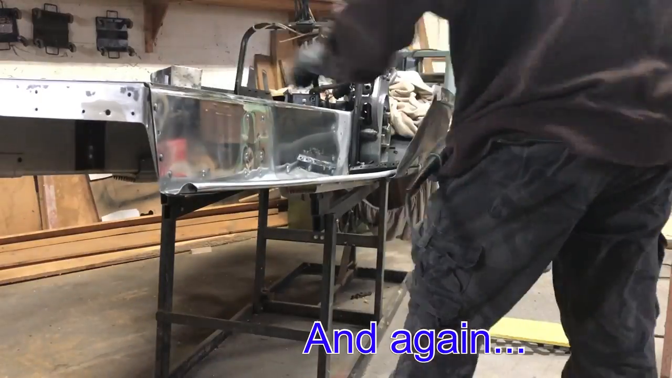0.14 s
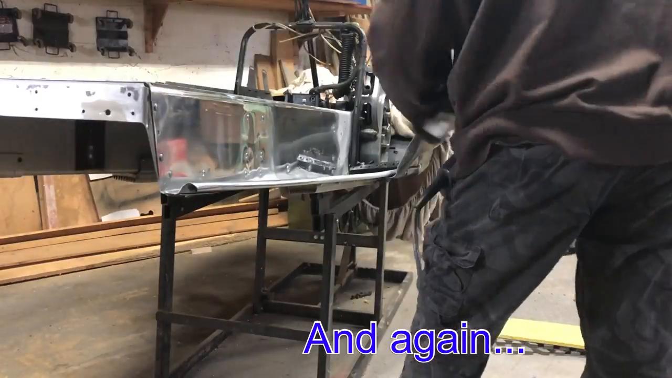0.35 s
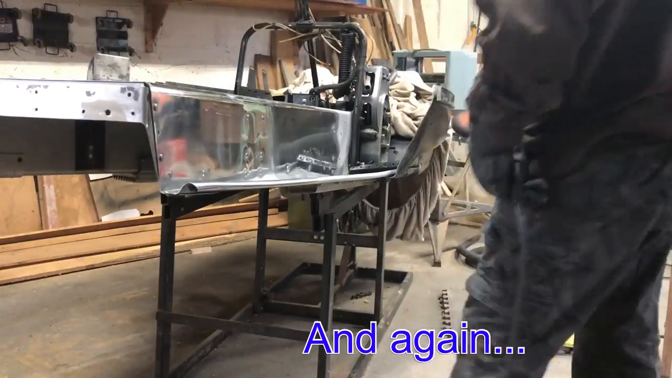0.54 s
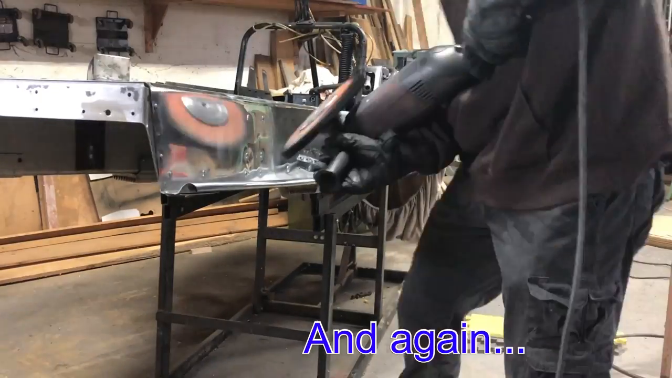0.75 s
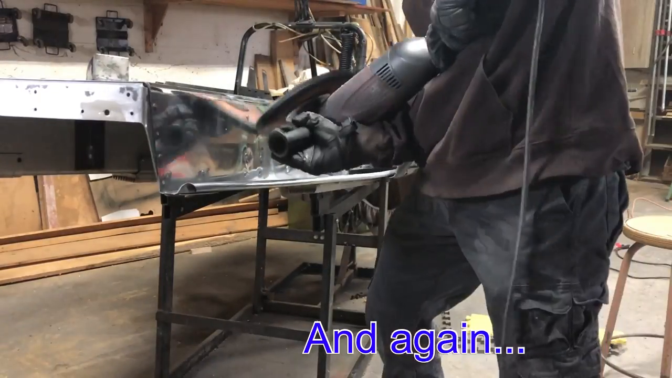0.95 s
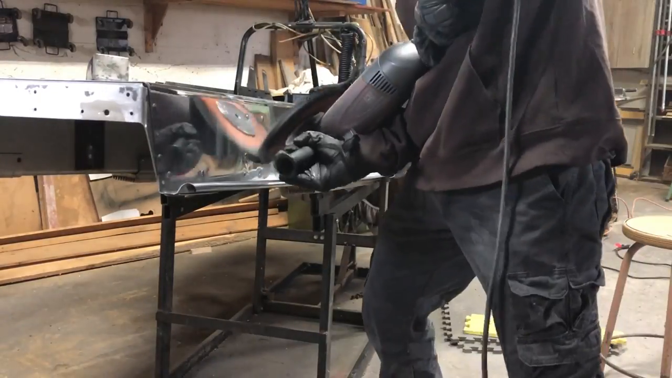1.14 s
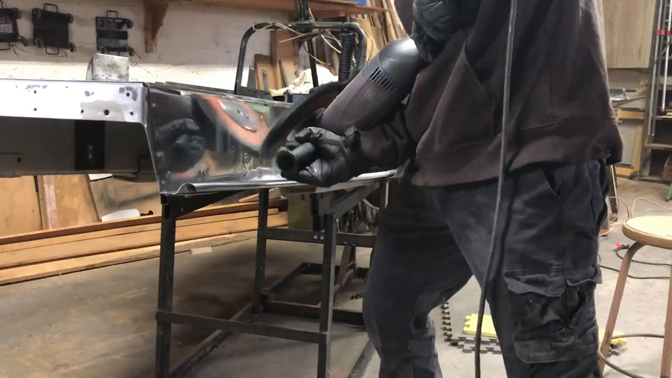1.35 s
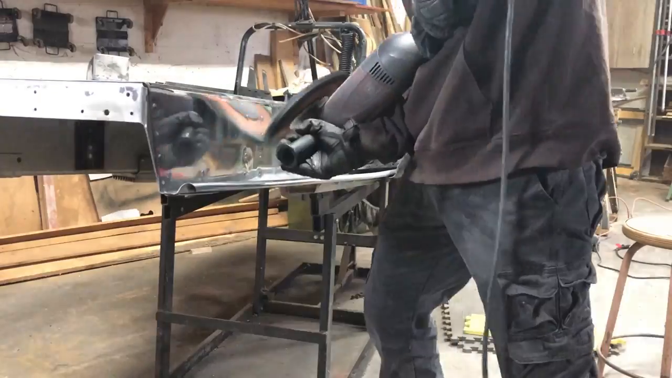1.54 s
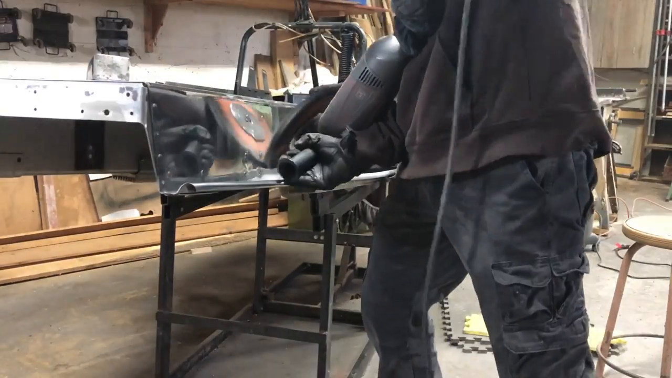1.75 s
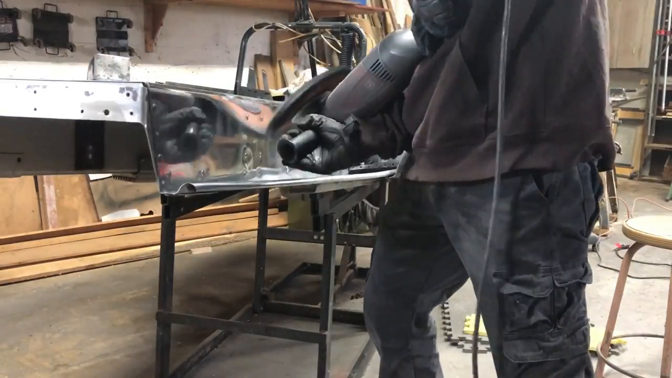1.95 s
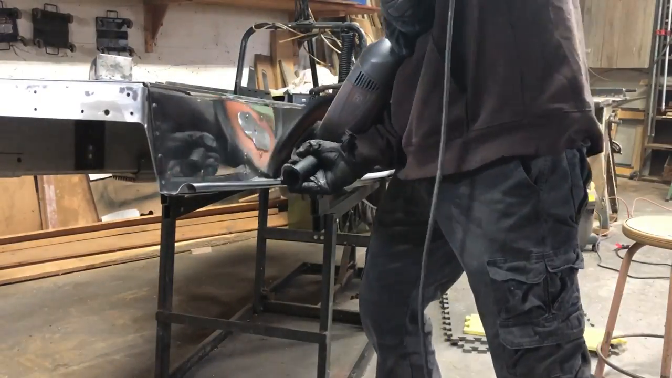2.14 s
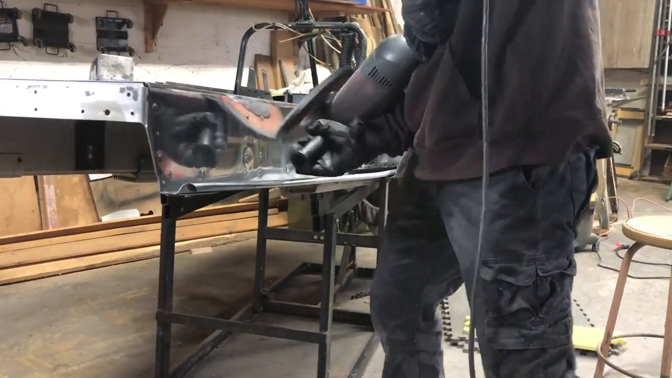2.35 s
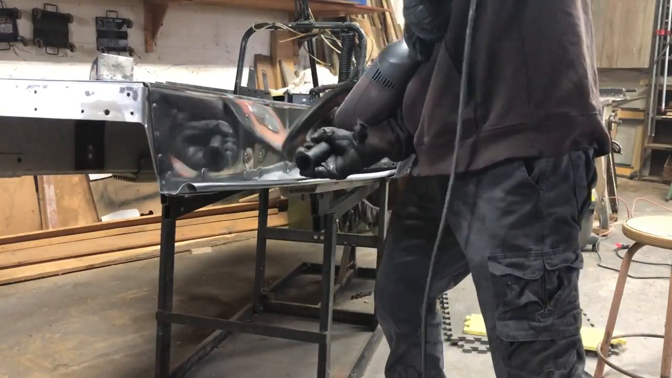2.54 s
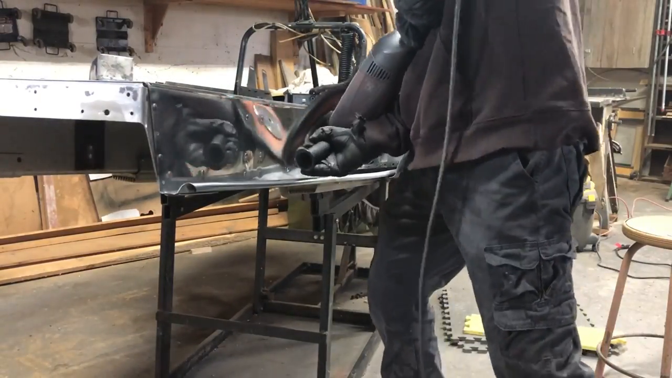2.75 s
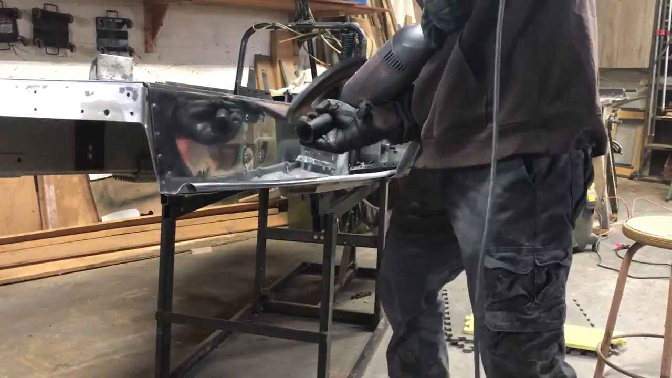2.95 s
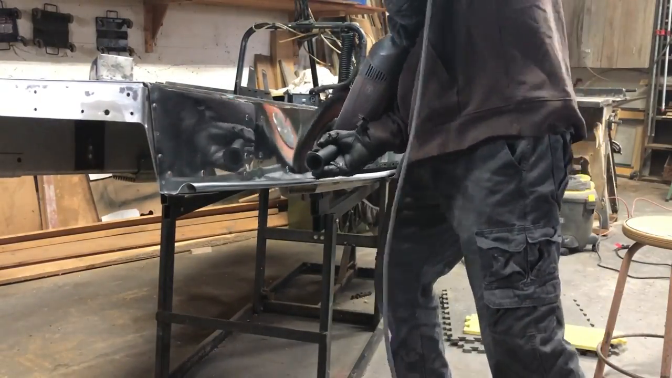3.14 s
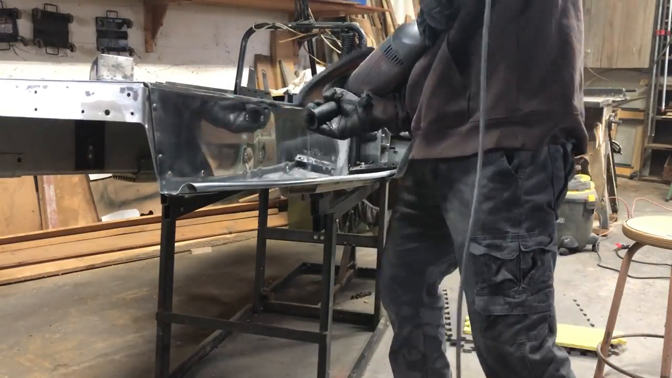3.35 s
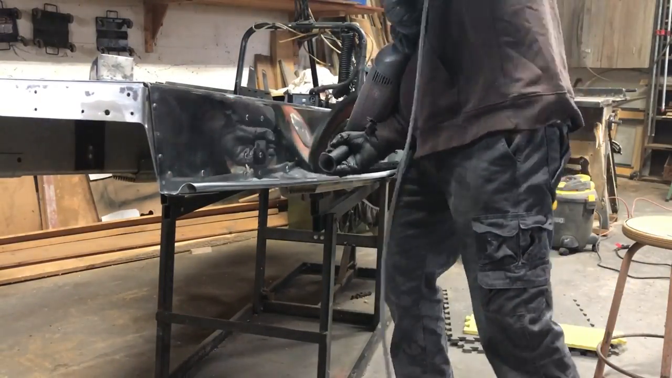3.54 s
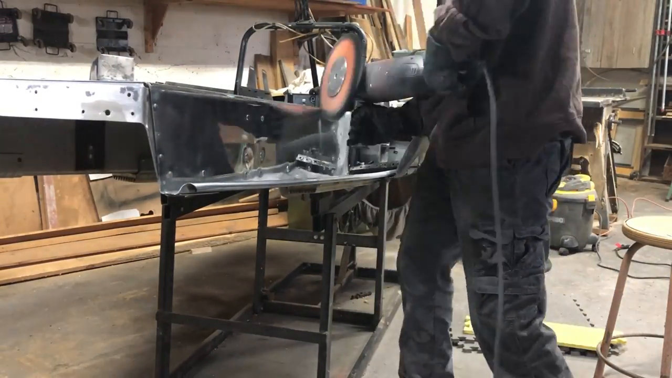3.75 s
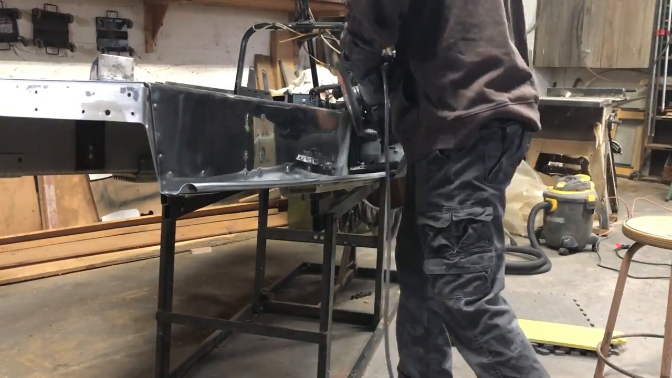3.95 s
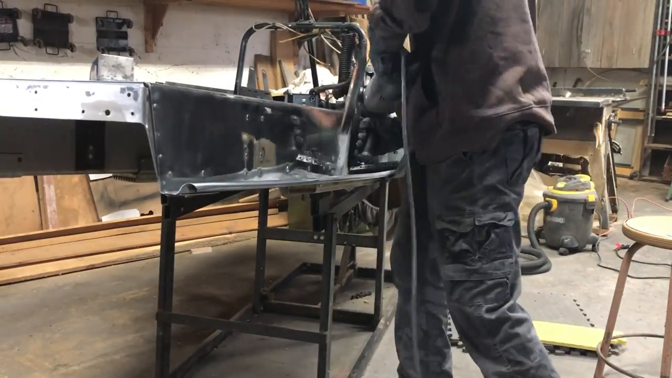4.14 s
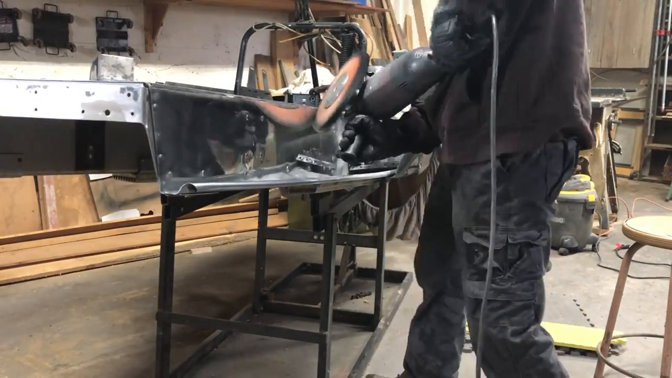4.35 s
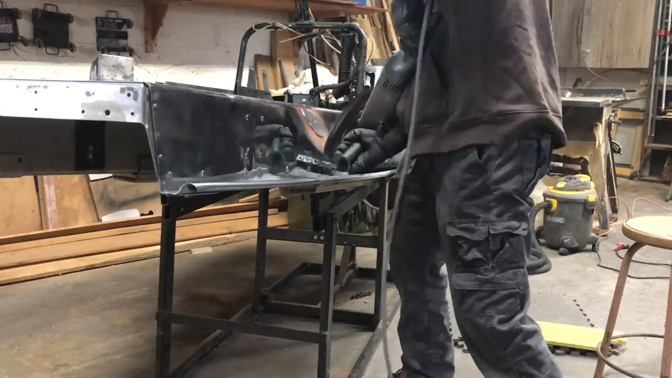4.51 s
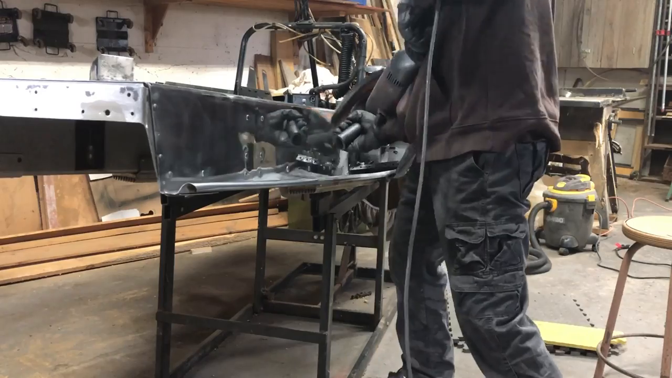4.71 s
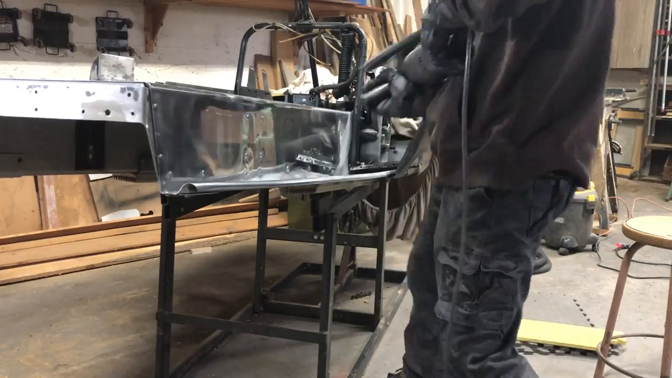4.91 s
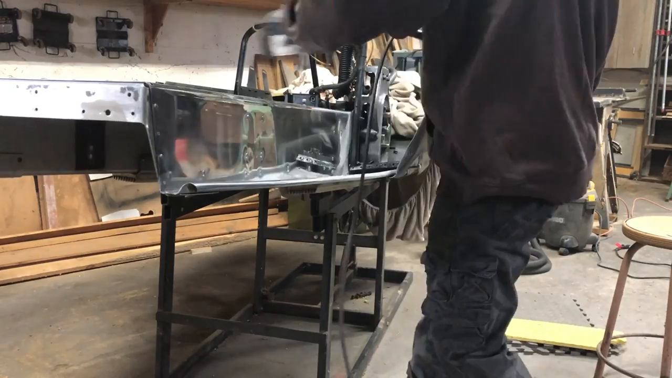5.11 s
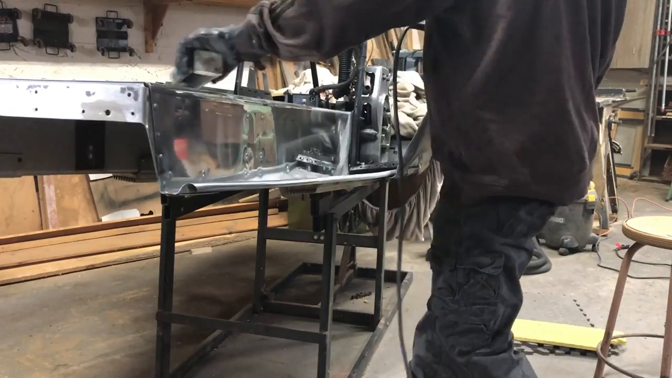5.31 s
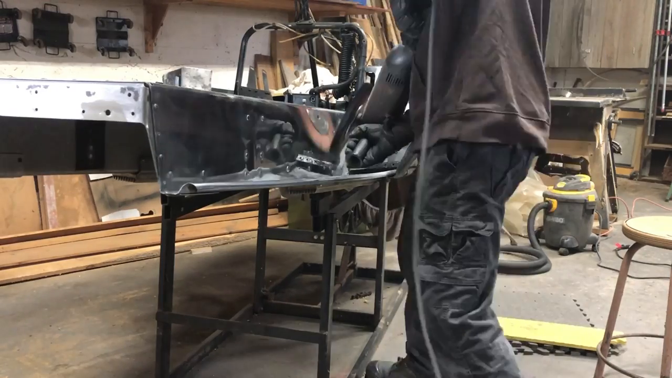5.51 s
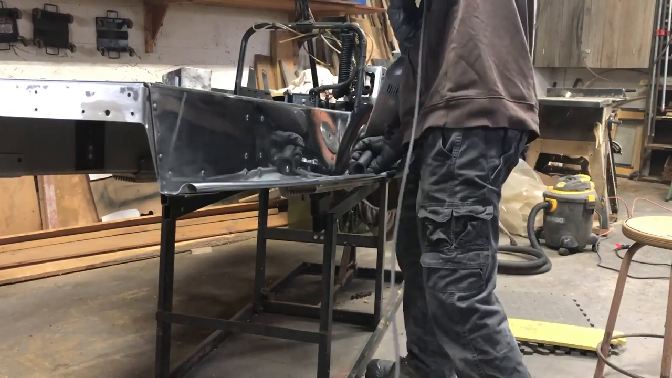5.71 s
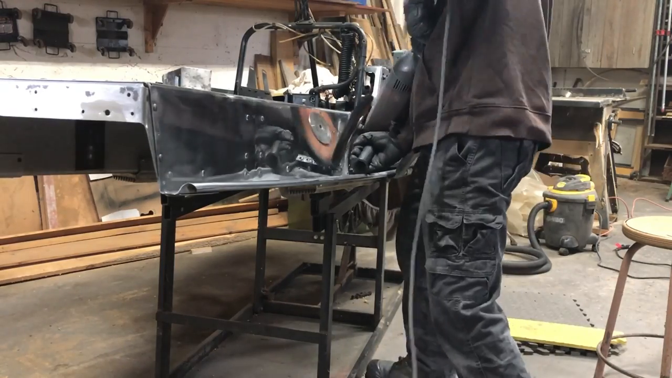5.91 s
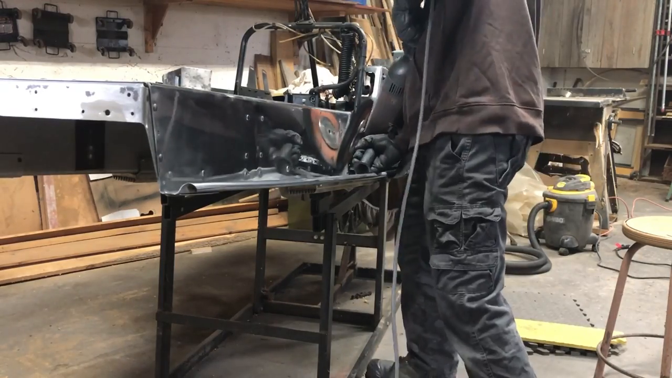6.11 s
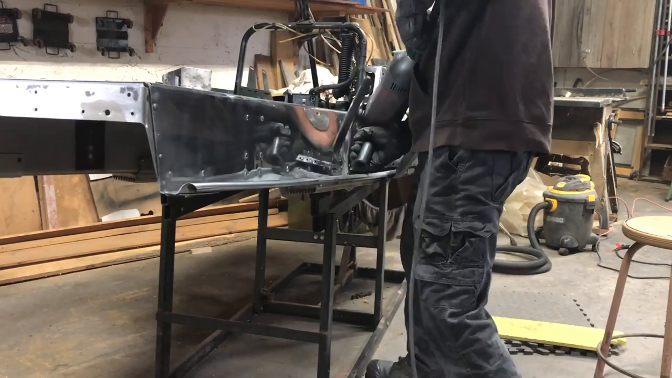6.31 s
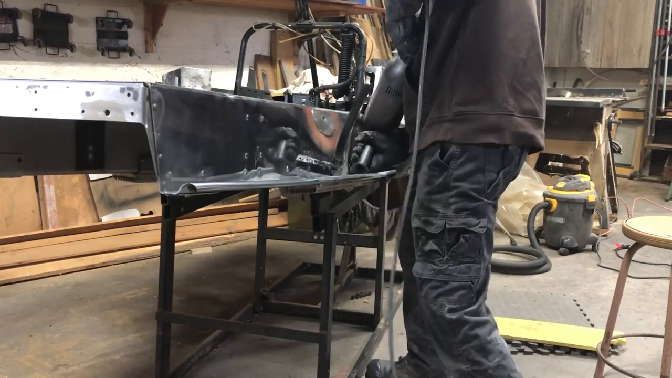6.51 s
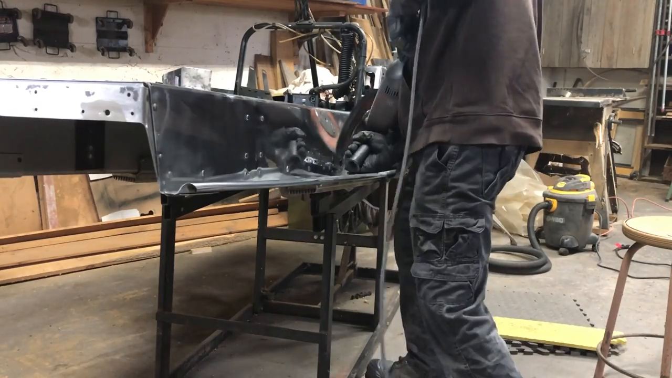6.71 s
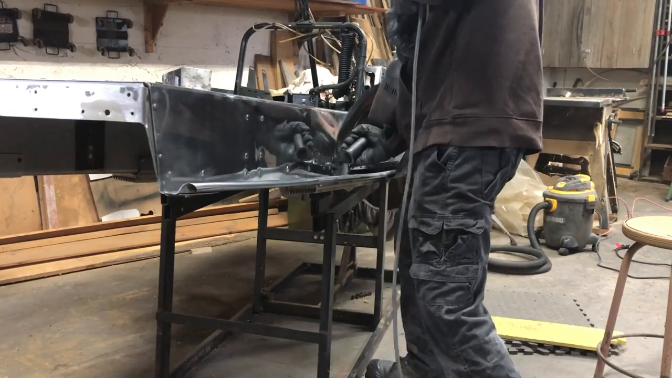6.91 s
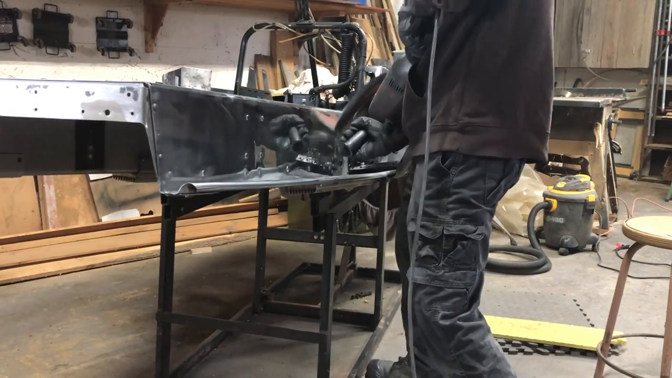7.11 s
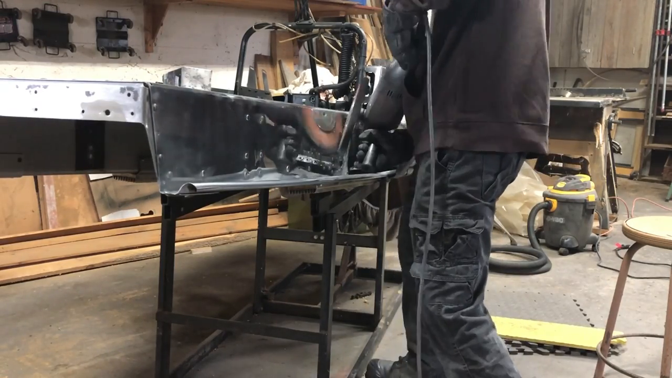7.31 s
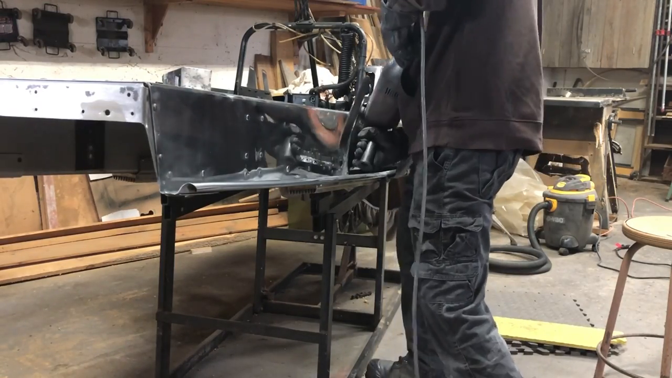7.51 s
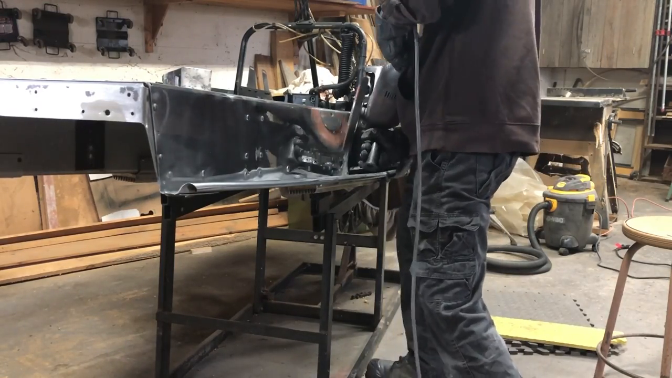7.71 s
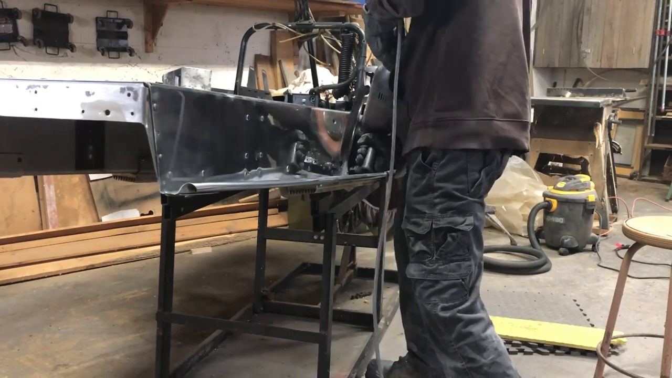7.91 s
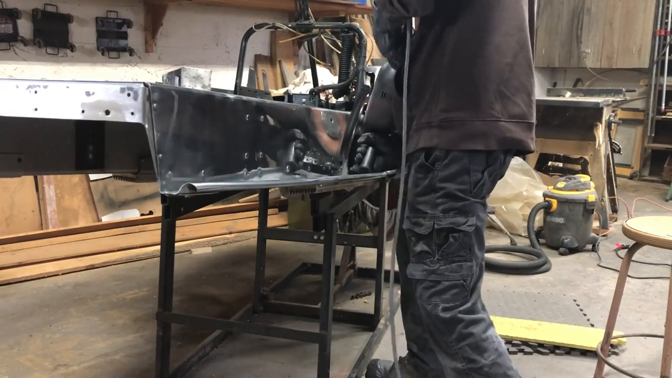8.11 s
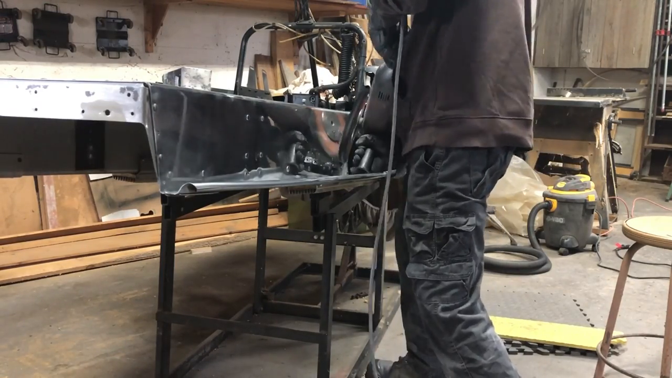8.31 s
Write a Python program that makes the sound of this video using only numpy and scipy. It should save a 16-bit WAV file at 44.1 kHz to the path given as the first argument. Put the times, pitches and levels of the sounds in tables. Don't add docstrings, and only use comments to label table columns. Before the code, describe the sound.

After a moment of quiet shop noise come a switch click, a rising fan whistle and a clank. A fast polisher whines freely, then grinds against thin metal in a ringing, singing, unsteady buzz. It lifts, presses again, pauses with a dab and a hard knock, then rubs on to the end. Close, mono, harsh and bass-light, quickened as if sped up.

```python
import sys
import numpy as np
from scipy import signal
from scipy.io import wavfile
from scipy.ndimage import uniform_filter1d

SR = 44100
rng = np.random.default_rng(int(sys.argv[2]) if len(sys.argv) > 2 else 0)


def int16_out(signal):
    q = np.round(np.clip(np.atleast_2d(signal).T, -1, 1) * 32767)
    wavfile.write(sys.argv[1], SR, q.astype(np.int16))


def volts_from_db(level):
    exponent = np.asarray(level, float) / 20
    return 10 ** exponent


N = 368676
CONTROL = 64

# [f/Hz, density/dB]
SHOP_COLOUR = [(88, -80), (150, -39), (725, -14), (815, -18), (898, -8), (1160, -17), (1580, -8),
               (15700, -18.5)]
# [f/Hz, level/dB]
SHOP_HUM = [(515, -71.5), (722, -62)]
# [t/s, f/Hz, level/dB]
COASTING_MACHINE = [(1.1, 690, -77), (1.3, 695, -52), (2.2, 663, -59), (3.3, 616, -55), (4.2, 559, -66),
                    (5.0, 543, -66), (5.8, 510, -73)]
# [t/s, level/dB]
HISS_LEVEL = [(0, -59), (.349, -31), (.444, -27), (.524, -22.5), (.913, -24), (1.44, -21), (1.56, -24),
              (2.2, -21), (2.5, -28.5), (3.7, -23.5), (3.86, -28), (4.05, -31.5), (4.94, -26.5),
              (4.99, -32.5), (5.24, -22.5), (5.5, -24.5), (6.3, -26), (8.36, -26.5)]
# [f/Hz, density/dB]
HISS_COLOUR = [(120, -78.5), (200, -39), (321, -21), (480, -51), (536, -19.5), (943, -24.5), (1050, -16),
               (1150, -14.5), (2030, -12), (2310, -8.5), (3380, -7.5), (4610, 0), (9000, 2.5), (15700, -10)]
# [t/s, level/dB, centre f/Hz, contact length/s, t60/s]
SCRAPES = [(0.135, -30.5, 6500, 0.0017, 0.021), (0.202, -38, 10000, .004, .02), (0.267, -66, 330, .01, .08),
           (0.373, -19.5, 6740, 0.028, 0.033), (0.366, -44, 2000, 0.07, .04), (.28, -55, 1100, .015, .05),
           (0.51, -21, 2000, 0.0035, 0.21), (0.917, -32.5, 1100, 0.008, 0.035),
           (1.943, -33, 1210, 0.012, .053), (2.084, -24.5, 2240, 0.064, 0.092),
           (3.558, -48, 1600, 0.016, 0.055), (5.4075, -14.5, 2400, 0.0017, 0.027),
           (5.413, -16, 2930, 0.005, 0.037), (7.39, -36.5, 1300, 0.016, .054)]
# [t/s, level/dB, centre f/Hz, contact length/s, t60/s]
PINGS = [
    (.507, -27, 1610, .012, .12),
    (0.49, -36, 2300, .015, .08),
    (.134, -36, 3050, .003, 0.045),
    (0.511, -35, 1000, 0.02, 0.12),
    (5.409, -27.5, 995, 0.025, 0.09),
    (5.396, -41.5, 327, .03, 0.35),
    (5.971, -39.5, 708, 0.042, .08),
    (8.279, -44, 720, 0.076, 0.11),
]
# [start t/s, end t/s, f/Hz, level/dB]
SWITCH_WHINES = [
    (0.187, .44, 3130, -41),
    (0.27, 0.36, 2410, -45),
    (.3, .44, 722, -56),
]
# [t/s, f/Hz, level/dB]
RUN_UP_WHISTLE = [(.2, 3500, -42), (.25, 5160, -32.5), (.29, 8140, -26), (.33, 12200, -21.5),
                  (.37, 15700, -27), (.4, 18000, -50)]
# [multiple of the wheel turn, level/dB, extra level under load/dB]
MOTOR_TONES = [(1.001, -49, -11), (1.999, -40, -15), (3.421, -43.5, -12), (4, -43, 0), (4.421, -35, -11),
               (6, -43, -7), (8.84, -52, -18)]
# [t/s, level/dB]
GEAR_WHINE = [(.33, -70), (.4, -44), (.49, -43), (.54, -44), (.57, -28), (.62, -21.5), (.66, -40),
              (.8, -35), (.9, -30), (1.02, -68)]
# [f/Hz, level/dB]
SHEET_COLOUR = [(450, -41), (1000, -6), (1550, -8), (1850, -7.5), (2350, -6.5), (3100, -2), (3650, -6.5),
                (4150, -2.5), (4600, -6.5), (5700, -2.5), (7000, -2), (8700, 1.5), (10500, -2.5),
                (15800, -6.5)]
# [t/s, length/s, order, share of
# range/dB]
SHEET_RINGS = [(1.035, 0.3, 7, -1.5), (1.148, 0.14, 6, -1), (1.277, 0.21, 7, -3.5), (1.3, 0.26, 2, -4.5),
               (1.5, 0.092, 7, -4), (1.59, 0.14, 6, -3.5), (1.624, 0.26, 2, -1), (1.705, 0.1, 5, -2.5),
               (1.82, 0.12, 6, -3.0), (2.03, 0.234, 4, -1.5), (2.02, 0.06, 6, -4.5), (2.135, 0.15, 7, 0),
               (2.265, 0.1, 6, -5), (2.663, 0.14, 6, -4.5), (2.806, 0.078, 7, -3.0), (2.86, 0.13, 3, 2.5),
               (2.9, 0.064, 7, -5), (2.978, 0.34, 4, -2.5), (3.1, 0.19, 7, -3), (3.186, 0.15, 2, 2.5),
               (3.48, 0.083, 4, -2), (3.544, 0.33, 7, -2.5), (3.986, 0.56, 4, 2), (4.535, 0.24, 7, 2),
               (4.73, 0.26, 2, -2.5), (4.74, 0.24, 6, -1), (5.627, 0.26, 7, -3), (5.837, 0.45, 4, -3),
               (6.014, 0.1, 7, -1), (6.081, 0.094, 6, -1.5), (6.1, 0.3, 4, -4), (6.12, 0.22, 7, -2.5),
               (6.105, 0.32, 3, -2.5), (6.352, 0.18, 2, -0.5), (6.481, 0.12, 6, 3.5), (6.491, 0.11, 7, 1.5),
               (6.54, 0.33, 4, 2.5), (6.695, 0.3, 7, -1.5), (6.784, 0.21, 6, 2.5), (6.79, 0.23, 4, 1),
               (7.115, 0.24, 6, -5.5), (7.19, 0.15, 7, -2), (7.408, 0.15, 3, 2), (7.48, 0.082, 6, -2),
               (7.55, 0.42, 4, 4), (7.707, 0.24, 6, -4), (7.93, 0.52, 4, -2.5), (8.097, 0.19, 5, -4.0),
               (8.215, 0.08, 6, -0.5), (8.27, 0.12, 5, -4.5),
               (1.008, 0.16, 21, -7), (1.2, 0.13, 20, -8.5), (1.46, 0.14, 17, -7.5), (1.47, 0.13, 21, -11),
             (1.473, 0.14, 14, -4), (1.49, 0.1, 23, -5.5), (1.635, 0.22, 12, -2.5), (1.757, 0.12, 21, -8),
             (1.86, 0.21, 23, -7), (1.89, 0.095, 19, -5), (2.013, 0.076, 13, -4), (2.124, 0.084, 12, -2.5),
             (2.15, 0.11, 19, -10), (2.603, 0.21, 20, -8.5), (2.954, 0.2, 21, -8.5), (3.046, 0.1, 14, -5.5),
             (3.29, 0.14, 12, 0.5), (3.297, 0.093, 19, -5.5), (3.875, 0.12, 20, -10),
             (3.878, 0.16, 17, -13), (3.904, 0.39, 14, -2.5), (4.135, 0.14, 17, -12),
             (4.35, 0.22, 24, -8.5), (5.672, 0.24, 20, -6.5), (5.956, 0.26, 18, -7.5),
             (6.053, 0.3, 19, -7.5), (6.06, 0.11, 9, -2.5), (6.195, 0.1, 18, -5.0), (6.408, 0.12, 18, -11),
             (6.41, 0.17, 20, -12), (6.44, 0.18, 19, -5.5), (6.542, 0.17, 16, -6), (6.7, 0.11, 18, -8),
             (6.726, 0.25, 17, -6.5), (6.988, 0.29, 14, -3.5), (7.018, 0.16, 19, -7),
             (7.08, 0.16, 21, -6.5), (7.403, 0.26, 18, -6), (7.473, 0.37, 20, -9.5),
             (7.515, 0.24, 19, -6.5), (7.63, 0.14, 12, -3.5), (7.698, 0.39, 18, -6), (7.853, 0.092, 20, -9),
             (7.894, 0.11, 13, -2.5), (8.022, 0.2, 12, -3.5), (8.034, 0.32, 18, -5.5),
             (8.14, 0.3, 20, -8.5), (8.208, 0.15, 13, -3),
               (1.404, 0.084, 3, -4), (1.798, 0.076, 3, 3.5), (1.808, 0.078, 4, 0), (2.01, 0.68, 2, -7),
              (2.26, 0.061, 3, -2), (2.625, 0.267, 4, -3.5), (2.755, 0.079, 3, 0.5), (2.788, 0.2, 2, -6.5),
              (2.8, 0.21, 9, -5), (3.1, 0.23, 3, -2), (3.1, 0.24, 9, -9), (3.502, 0.24, 2, -7.5),
              (4.548, 0.075, 2, 2), (6.41, 0.18, 3, -2), (7.413, 0.5, 2, -3.5), (7.253, 0.13, 7, -9),
              (0.993, 0.067, 12, 2), (1.05, 0.11, 15, -4.5), (1.207, .1, 9, 0), (1.307, .12, 12, -5),
              (1.445, 0.15, 6, -4.5), (1.606, 0.14, 3, -0.5), (6.23, 0.15, 12, -4.5),
              (6.328, 0.072, 19, -4), (6.78, .55, 11, -8.5), (8.263, 0.11, 15, -8.5)]
# [t/s, turn f/Hz]
PASS_1 = [
    [(0.91, 537), (0.94, 536), (1.078, 455), (1.12, 453), (1.16, 433), (1.262, 421), (1.304, 431),
     (1.4, 470)],
    [(1.41, 464), (1.464, 446), (1.536, 437), (1.576, 443), (1.634, 436), (1.752, 451), (1.774, 445),
     (1.838, 455), (1.9, 437)],
    [(1.91, 438), (1.978, 432), (2.02, 443), (2.09, 441), (2.232, 457), (2.366, 446), (2.418, 462),
     (2.44, 460)],
]
PASS_2 = [
    [(2.57, 540.1), (2.606, 509.9), (2.716, 483.0), (2.72, 477.2), (2.904, 461.0), (2.93, 466.2),
     (3.0, 465.8)],
    [(3.01, 462.4), (3.03, 461.0), (3.274, 475.5), (3.308, 465.8), (3.396, 474.2), (3.43, 472.1)],
    [(3.465, 485.4), (3.515, 491.0), (3.551, 484.1), (3.603, 462.1), (3.661, 479.2), (3.729, 476.6),
     (3.77, 493.0)],
]
PASS_3 = [
    [(3.79, 491.5), (3.798, 490.6), (3.864, 433.5), (3.912, 418.4), (4.036, 450.0), (4.234, 437.0),
     (4.32, 475.4), (4.368, 476.9), (4.4, 467.6)],
    [(4.41, 466.7), (4.456, 460.6), (4.504, 492.5), (4.554, 509.7), (4.61, 510.5), (4.642, 485.2),
     (4.708, 489.3), (4.796, 458.1), (4.945, 461.4)],
]
DAB = [
    [(5.24, 538), (5.31, 498), (5.33, 495), (5.365, 508)],
]
PASS_4 = [
    [(5.57, 540.6), (5.69, 495.5), (5.7, 484.4), (5.81, 438.2), (5.828, 435.9), (5.856, 445.1),
     (5.884, 439.0), (6.01, 460.5), (6.03, 453.0)],
    [(6.04, 451.2), (6.188, 474.5), (6.312, 482.4), (6.378, 472.9), (6.438, 482.5), (6.66, 454.4)],
    [(6.67, 458.9), (6.71, 446.9), (6.764, 450.3), (6.798, 460.8), (6.938, 463.7), (6.958, 458.7),
     (7.044, 477.1), (7.06, 473.1)],
    [(7.07, 465.5), (7.202, 460.2), (7.226, 466.0), (7.262, 456.7), (7.29, 463.9), (7.322, 457.5),
     (7.358, 469.1), (7.38, 482.5)],
]
PASS_5 = [
    [(7.39, 490.4), (7.422, 494.5), (7.518, 482.6), (7.564, 483.4), (7.608, 470.5), (7.8, 482.4)],
    [(7.81, 487.0), (8.098, 481.5), (8.152, 476.9), (8.36, 489.4)],
]
PASSES = [PASS_1, PASS_2, PASS_3, DAB, PASS_4, PASS_5]
# [t/s, pad level/dB, seat of the pad on the sheet/dB]
PRESS_1 = [(0.91, -19, -11), (0.978, -15.5, -15), (1.834, -15, -8.5), (2.418, -16.5, -14.5),
           (2.44, -24.5, -2)]
PRESS_2 = [(2.57, -18.5, -14), (2.6, -16.5, -12.5), (3.32, -16.5, -10), (3.45, -25.5, -18.5),
           (3.5, -17.5, -12), (3.71, -16, -6), (3.745, -24.5, -16), (3.77, -20.5, -18)]
PRESS_3 = [(3.79, -18.5, -16), (3.814, -16, -19.5), (4.67, -21.5, -14), (4.914, -17.5, -14.5),
           (4.936, -24.5, -1.5), (4.945, -25, -21)]
PRESS_DAB = [(5.24, -34, -10), (5.3, -24, -8), (5.35, -36, -8), (5.365, -45, -8)]
PRESS_4 = [(5.57, -19.5, -12.5), (5.6, -14.5, -13.5), (5.92, -17, -11), (6.1, -14.5, -9.5),
           (6.5, -15.5, -13), (7.0, -19, -7.5), (7.3, -19.5, -15.5), (7.33, -24, -16), (7.381, -21.5, -18)]
PRESS_5 = [(7.39, -19, -18.5), (7.468, -13, -12.5), (7.488, -15, -12.5), (8.36, -17, -10.5)]
PRESSES = [PRESS_1, PRESS_2, PRESS_3, PRESS_DAB, PRESS_4, PRESS_5]
# [t/s, seat change/dB, half length/s]
BITES = [(1.254, 4.5, 0.15), (1.338, -3, 0.1), (1.445, 9.5, 0.067), (1.563, -5.5, 0.034),
         (1.615, 3.5, 0.035), (1.858, 5, 0.065), (1.99, -5, 0.034), (2.092, 6.5, 0.096), (2.28, 8.5, 0.19),
         (2.855, 6.5, 0.12), (2.964, 5.5, 0.096), (3.095, -9, 0.062), (3.141, 9, 0.066), (3.58, 4, 0.099),
         (4.055, -9.5, 0.046), (4.594, 4, 0.043), (4.778, 6.5, 0.046), (4.853, 9.5, 0.0069),
         (5.703, 3, 0.03), (6.25, 5, 0.097), (6.42, -6, 0.067), (6.74, 7.5, 0.035), (7.051, -8, 0.1),
         (7.3, 7, 0.13), (7.818, -3, 0.05), (8.308, 2, 0.096)]
# [t/s, length/s, shake f/Hz, depth as a share of the speed]
CHATTER = [
    (1.01, 0.29, 16.7, .002),
    (4.753, 0.23, 25, 0.005),
    (5.621, 0.33, 22, 0.0032),
    (6.619, 0.37, 20.96, 0.0022),
    (6.998, 0.32, 18, 0.004),
]
# [t/s, amplitude]
HEADROOM = [(.6, .55), (.66, .24), (.95, .3), (1.05, .52), (2.5, .52), (2.56, .38), (2.8, .5), (3.75, .5),
            (3.82, .38), (4.4, .33), (4.5, .56), (5.45, .56), (5.52, .36), (6, .5), (6.7, .48), (6.8, .72)]
# [t/s, centre f/Hz]
NOISE_BURSTS = [(.595, 7300), (1.129, 9000), (1.501, 13100), (1.665, 12400), (2.128, 12800), (2.381, 6100),
                (3.614, 9300), (3.985, 10700), (4.518, 10300), (5.11, 10300), (5.702, 12100), (5.889, 9600),
                (5.889, 13100), (6.111, 12000), (6.33, 9000), (6.516, 7000), (7.374, 8900), (7.49, 13400),
                (8.024, 9300)]

FREE_HZ, LOADED_HZ = 542, 450
SWITCH_S, RUN_UP_S, STARTED_S = .125, .455, .56


def evened(x):
    return x / np.sqrt(np.mean(abs(x) ** 2) + 1e-20)


def read(points, hz):
    f, value = np.transpose(points)
    return np.interp(np.log(hz + 1), np.log(f + 1), value)


def curves(rows, t):
    s, *columns = np.transpose(rows)
    return [np.interp(t, s, c) for c in columns]


def drift(count, seconds):
    span = max(round(seconds * SR / CONTROL), 1)
    steps = rng.standard_normal((count, N // CONTROL + 2))
    smooth = uniform_filter1d(steps, span, axis=1)
    return evened(uniform_filter1d(smooth, span, axis=1))


def full_rate(track):
    return np.interp(np.arange(N) / CONTROL, np.arange(len(track)), track)


def resonate(x, hz, width):
    turn = np.exp(2j * np.pi * np.cumsum(hz * np.ones(len(x))) / SR)
    r = np.exp(-np.pi * width / SR)
    return 2 * (turn * signal.lfilter([1 - r], [1, -r], x / turn)).real


def noise(colour_db):
    a, b = rng.standard_normal((*colour_db.shape[::-1], 2)).T
    return signal.istft((a + 1j * b) * volts_from_db(colour_db), nperseg=512, noverlap=384)[1][:N]


def speed_at(t):
    bend, recover_s = .3, .036
    up = np.clip((t - SWITCH_S) / RUN_UP_S, .03, 1)
    hz = FREE_HZ * (up + bend * up * (1 - up) * 2)
    passes = [sum(strokes, []) for strokes in PASSES]
    for rows, following in zip(passes, passes[1:] + [[(99, 0)]]):
        start, end = rows[0][0], rows[-1][0]
        lifted = following[0][0] - end > .05
        late = np.maximum(t - end, 0) * lifted
        pressed = FREE_HZ - (FREE_HZ - curves(rows, t)[0]) * np.exp(-late / recover_s)
        hz = np.where(t >= start, pressed, hz)
    return hz


def load_at(t):
    sag = (FREE_HZ - speed_at(t)) / (FREE_HZ - LOADED_HZ)
    return np.clip(sag, 0, 1.3) * (t > STARTED_S)


def hand(t):
    land_s, lift_s, lifted_db = 0.035, 0.055, -30
    level_db, seat_db = curves(sum(PRESSES, []), t)
    touches = []
    for press in PRESSES:
        inside = np.minimum((t - press[0][0]) / land_s, (press[-1][0] - t) / lift_s)
        touches.append(np.clip(inside + 1, 0, 1))
    touch = np.max(touches, 0)
    for s, db, half in BITES:
        seat_db = seat_db + db * np.cos(np.pi / 2 * np.clip((t - s) / half, -1, 1)) ** 2
    return level_db + lifted_db * (1 - touch), seat_db, touch


def wheel_angle():
    t = np.arange(N) / SR
    hz = uniform_filter1d(uniform_filter1d(speed_at(t), 600), 600)
    shake = .0012 * full_rate(drift(1, .012)[0]) + .001 * full_rate(drift(1, .03)[0])
    for s, length, rate, depth in CHATTER:
        swell = np.sin(np.pi * np.clip((t - s) / length, 0, 1)) ** 2
        shake = shake + depth * np.sin(2 * np.pi * rate * (t - s)) * swell
    return 2 * np.pi * np.cumsum(hz * (1 + shake)) / SR


def air_unevenness():
    bins, frames = 257, N // 128 + 5
    patches = uniform_filter1d(rng.standard_normal((frames, bins)).T, 9, axis=0)
    patches = evened(uniform_filter1d(patches, 12, axis=1))
    flicker = evened(uniform_filter1d(rng.standard_normal(frames), 5))
    return 1.8 * patches + .6 * flicker


def shop_floor(unevenness_db):
    hz = np.fft.rfftfreq(512, 1 / SR)
    return volts_from_db(-44.5) * evened(noise(read(SHOP_COLOUR, hz)[:, None] + unevenness_db))


def shop_hum():
    early_db = 9 * (np.arange(N) / SR < STARTED_S)
    tones = sum(volts_from_db(db) * evened(resonate(rng.standard_normal(N), hz, 8.1)) for hz, db in SHOP_HUM)
    return volts_from_db(early_db) * tones


def fan_hiss(angle, unevenness_db):
    hz = np.fft.rfftfreq(512, 1 / SR)
    t = np.arange(N // 128 + 5) * 128 / SR
    slowing = -uniform_filter1d(np.gradient(speed_at(t), t), 12)
    scuff_db = np.clip(slowing / 600, 0, 1.5)
    _, seat_db, touch = hand(t)
    hiss_db = curves(HISS_LEVEL, t)[0] + scuff_db - 6.5 * touch
    roar_db = -1.5 + touch * (4.5 + 0.068 * seat_db - scuff_db)
    roar_db = roar_db + 6.5 * np.clip(1 - t / STARTED_S, 0, .55)
    row_hz = hz[:, None]
    low = 1 / (1 + (row_hz / 4000) ** 4)
    top = 1 / (1 + (10000 / (row_hz + 1)) ** 4)
    damped = 1 / (1 + (row_hz / 1900) ** 4)
    shape_db = read(HISS_COLOUR, hz)[:, None] + 0 * t
    scale = 1 / np.std(noise(shape_db))
    load_db = (-4 * top - 5.5 * damped) * load_at(t)
    field_db = shape_db + hiss_db + low * (roar_db + 10) + load_db + unevenness_db
    return scale * noise(field_db) * (1 + 0.15 * np.cos(angle))


def knocks():
    out, t = np.zeros(N + SR), np.arange(SR // 2) / SR
    for wide, rows in [(0.97, SCRAPES), (0.058, PINGS)]:
        for s, db, hz, length, t60 in rows:
            grit = rng.standard_normal(len(t)) * volts_from_db(2.5 * rng.exponential(1, len(t)))
            grit = signal.sosfilt(signal.butter(2, hz / 3, "high", fs=SR, output="sos"), grit)
            ring = evened(resonate(resonate(grit, hz, wide * hz), hz, 2 * wide * hz))
            shape = np.minimum(t / 0.00021, 1) * volts_from_db(-60 * np.maximum(t - length, 0) / t60)
            out[round(s * SR):][:len(t)] += volts_from_db(db) * ring * shape
    return out[:N]


def switch_whines():
    t, out = np.arange(N) / SR, np.zeros(N)
    for start, end, hz, db in SWITCH_WHINES:
        gate = np.clip(np.minimum(t - start, end - t) / 0.013, 0, 1)
        out += volts_from_db(db) * evened(resonate(rng.standard_normal(N), hz, 37)) * gate
    return out


def run_up_whistle():
    t = np.arange(N) / SR
    hz, db = curves(RUN_UP_WHISTLE, t)
    whoosh = resonate(resonate(rng.standard_normal(N), hz, 3000), hz, 3000)
    sounding = (t > RUN_UP_WHISTLE[0][0]) * (t < RUN_UP_WHISTLE[-1][0])
    return volts_from_db(db) * evened(whoosh) * sounding


def motor(angle):
    t = np.arange(N) / SR
    started = t >= STARTED_S
    rise = np.clip(speed_at(t) / 520, 0, 1) ** 8 * ~started + started
    rise = rise * volts_from_db(0.51 * (curves(HISS_LEVEL, np.maximum(t, STARTED_S))[0] + 27))
    load, tones = load_at(t), np.zeros(N)
    for (multiple, db, load_db), waver in zip(MOTOR_TONES, drift(len(MOTOR_TONES), 0.028)):
        tones += volts_from_db(db + load_db * load + 2.5 * full_rate(waver)) * np.cos(multiple * angle)
    gear = volts_from_db(curves(GEAR_WHINE, t)[0]) * np.cos(6 * angle)
    return rise * tones + gear


def singing_orders(t, shape):
    held, share = np.zeros((2, *shape))
    for s, length, order, db in SHEET_RINGS:
        now = np.clip(np.minimum(t - s, s + length - t) / 0.014 + .5, 0, 1)
        k = round(order) - 1
        share[k] = np.where(now > held[k], volts_from_db(db), share[k])
        held[k] = np.maximum(now, held[k])
    return held, share


def pad(angle):
    t = np.arange(N // CONTROL + 2) * CONTROL / SR
    hz = speed_at(t)
    level_db, seat_db, _ = hand(t)
    buzz_db = level_db + seat_db
    boom_db = -7.5 + 0.12 * (seat_db - 1) + 3 * drift(1, 0.065)[0]
    rim_db, edge_db = -1.5 - 0.5 * seat_db, -2 - seat_db
    partial_hz = np.arange(1, 38)[:, None] * hz
    count = len(partial_hz)

    gliding = np.clip(uniform_filter1d(abs(np.gradient(hz, t)), 40) / 300, .25, 1)
    fade = drift(2 * count, 0.061) + 0.73 * drift(2 * count, 0.016)
    fray = 0.6 * gliding * (np.tile(partial_hz, (2, 1)) / 10900) ** 2
    fade = fade + fray * drift(2 * count, .003)
    fade = fade[:count] + 1j * fade[count:]
    phase = np.exp(2j * np.pi * rng.random((count, 1)))

    held, share = singing_orders(t, fade.shape)
    singing = held * share * np.sqrt(2) * (phase + 0.33 * fade)
    modes = np.interp(partial_hz / 45, np.arange(400), rng.standard_normal(400))
    colour_db = read(SHEET_COLOUR, partial_hz) + 4 * gliding * modes
    fade = (1 - held) * (fade + phase) * volts_from_db(colour_db)

    strength = np.zeros_like(fade)
    ranges = [(600, 2200, boom_db), (2200, 4000, 0), (4000, 7000, rim_db), (7000, 16000, edge_db)]
    for lo, hi, db in ranges:
        inside = (partial_hz >= lo) & (partial_hz < hi)
        power = uniform_filter1d((abs(inside * fade) ** 2).sum(0) / 2, 20) + 1e-9
        rest = np.maximum(1 - ((inside * held * share) ** 2).sum(0), 0.11)
        mixed = fade * np.sqrt(rest / power) + singing
        strength = strength + inside * volts_from_db(buzz_db + db + 1.06) * mixed

    strength = strength * volts_from_db(0.64 * drift(1, 0.0072) + drift(1, 0.026))
    for s, length, rate, _ in CHATTER:
        swell = np.sin(np.pi * np.clip((t - s) / length, 0, 1))
        strength = strength * volts_from_db(1.5 * np.cos(2 * np.pi * rate * (t - s)) * swell)

    out, turn, spin = np.zeros(N), np.exp(1j * angle), 1
    for track in strength:
        spin = spin * turn
        out += (full_rate(track) * spin).real
    return out


def coasting_machine():
    hz, db = curves(COASTING_MACHINE, np.arange(N) / SR)
    return volts_from_db(db) * np.cos(2 * np.pi * np.cumsum(hz) / SR)


def scene():
    angle = wheel_angle()
    polisher = pad(angle) + motor(angle)
    unevenness_db = air_unevenness()
    air = fan_hiss(angle, unevenness_db) + shop_floor(unevenness_db)
    whistles = run_up_whistle() + switch_whines() + coasting_machine() + shop_hum()
    mono = polisher + air + whistles + knocks()
    return np.array([mono, mono])


def noise_bursts(x):
    hz, t, z = signal.stft(x, SR, nperseg=256)
    a, b = rng.standard_normal((2, *z.shape))
    out, half_s = z.copy(), 1024 / SR
    for s, centre in NOISE_BURSTS:
        band, near = abs(hz / centre - 1) < .13, abs(t - s) < half_s
        cell = np.ix_([0, 1], band, near)
        share = np.cos(np.pi / 2 * (t[near] - s) / half_s) ** 2
        burst = volts_from_db(1) * np.std(z[cell]) * (a + 1j * b)[cell]
        out[cell] = (1 - share) * z[cell] + share * burst
    return signal.istft(out, SR, nperseg=256)[1][:, :N]


def roll_off(x):
    return signal.sosfilt(signal.butter(12, 15810, fs=SR, output="sos"), x)


def record(dry):
    cut = signal.sosfilt(signal.butter(6, 290, "high", fs=SR, output="sos"), dry)
    knee = curves(HEADROOM, np.arange(N) / SR)[0]
    over = np.maximum(abs(cut) - knee, 0)
    squeezed = cut - 0.6 * np.sign(cut) * over
    self_noise = volts_from_db(-76) * rng.standard_normal(N)
    return roll_off(noise_bursts(squeezed + self_noise))


dry = scene()
out = record(dry)
int16_out(out)
```